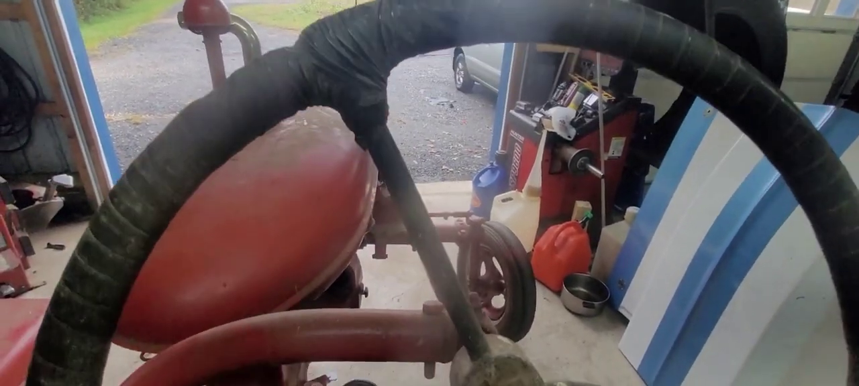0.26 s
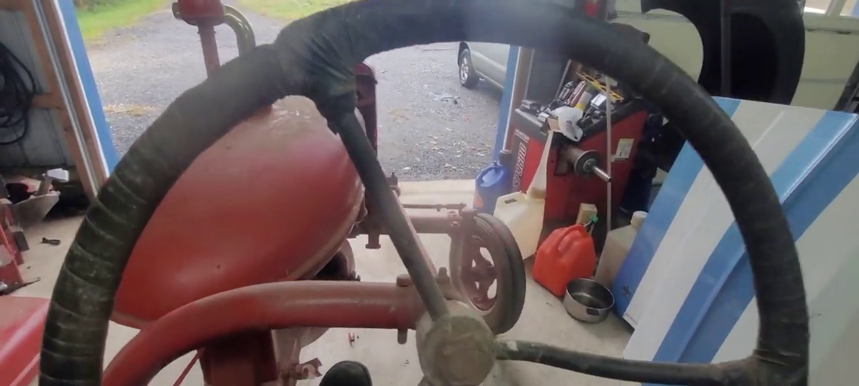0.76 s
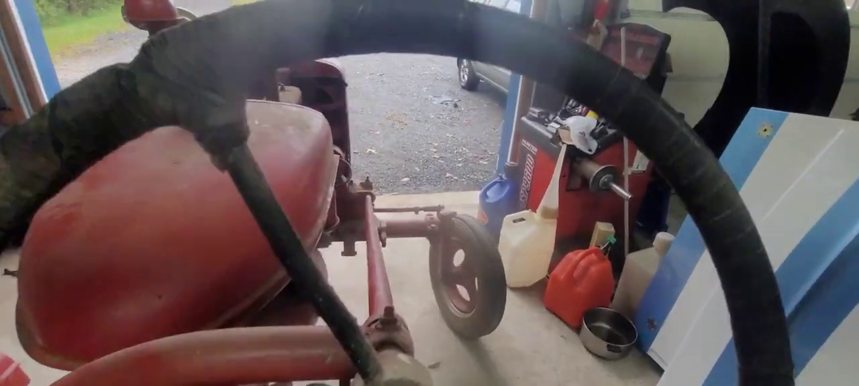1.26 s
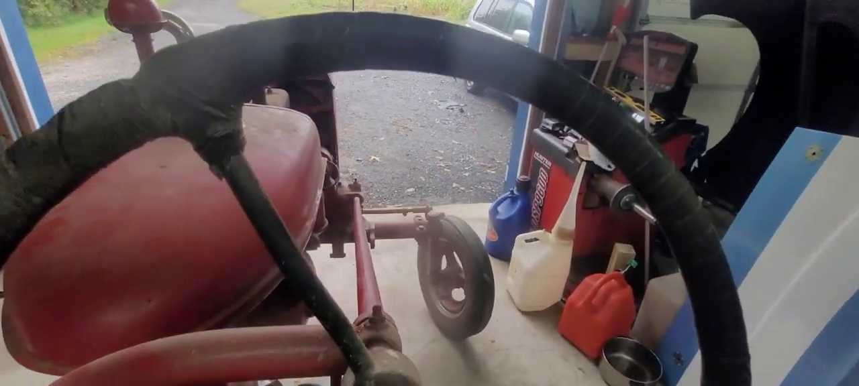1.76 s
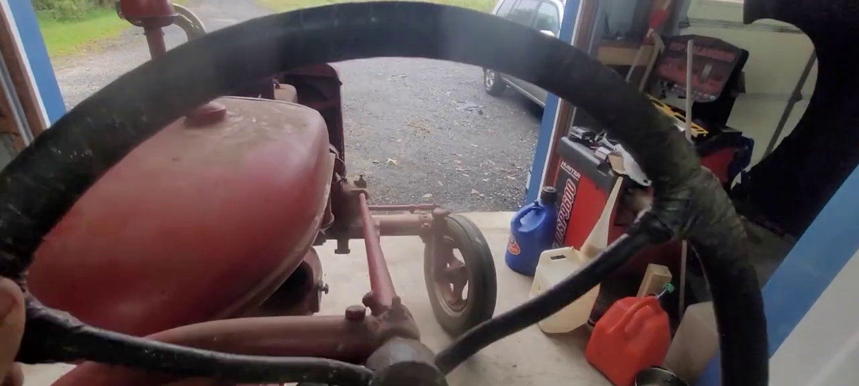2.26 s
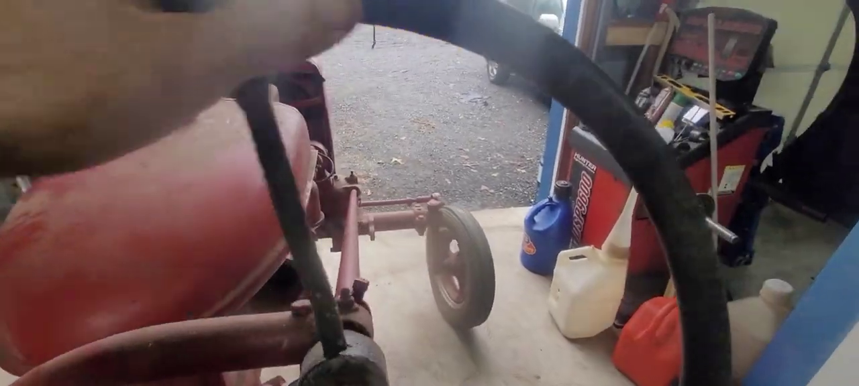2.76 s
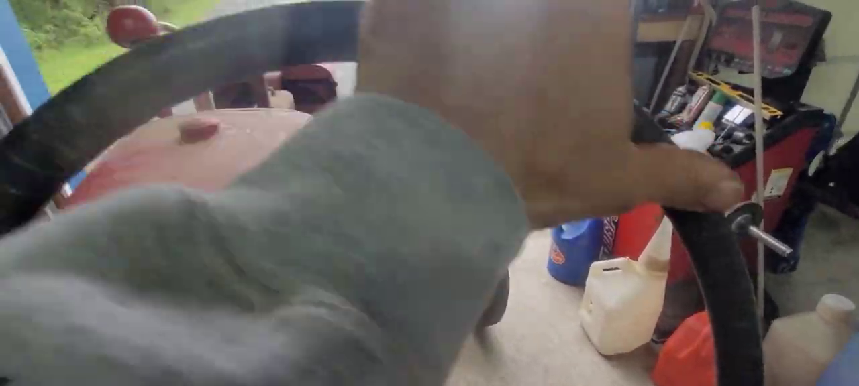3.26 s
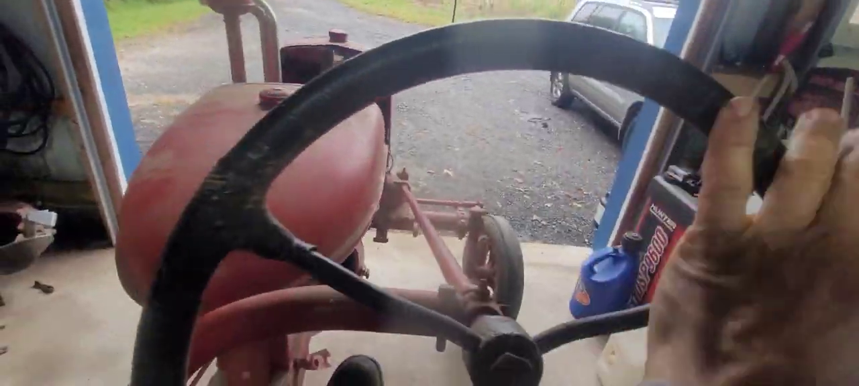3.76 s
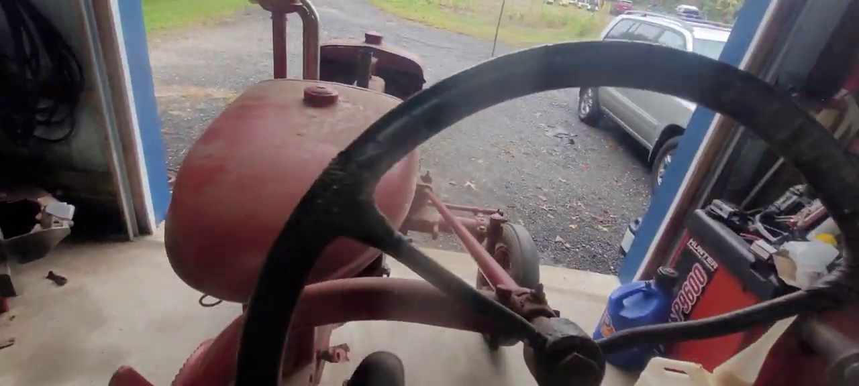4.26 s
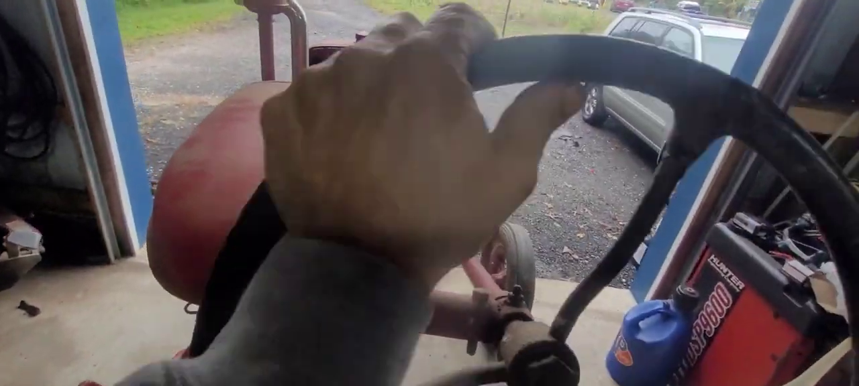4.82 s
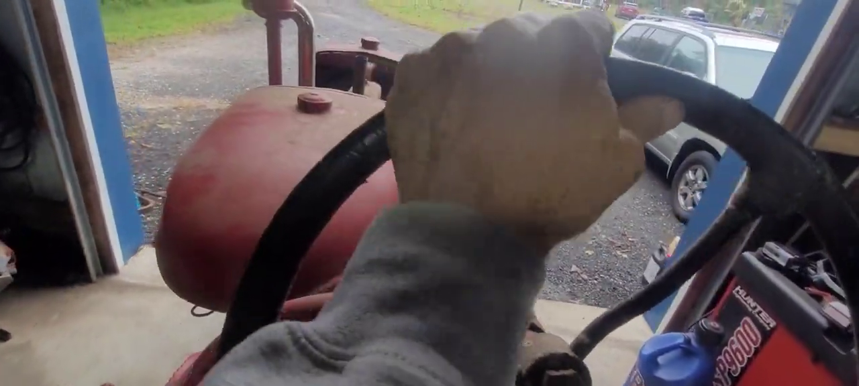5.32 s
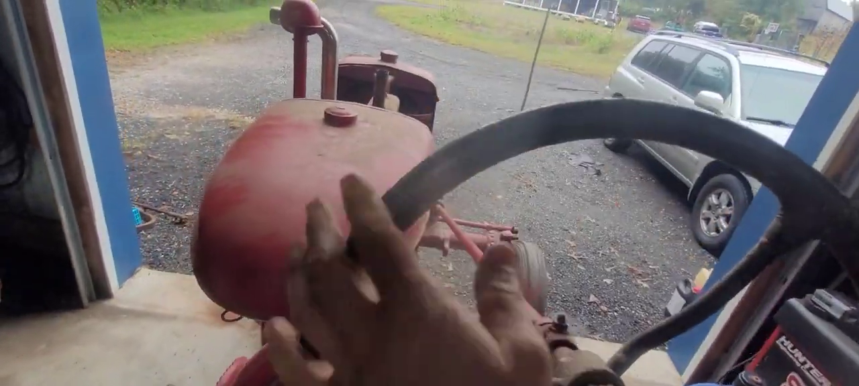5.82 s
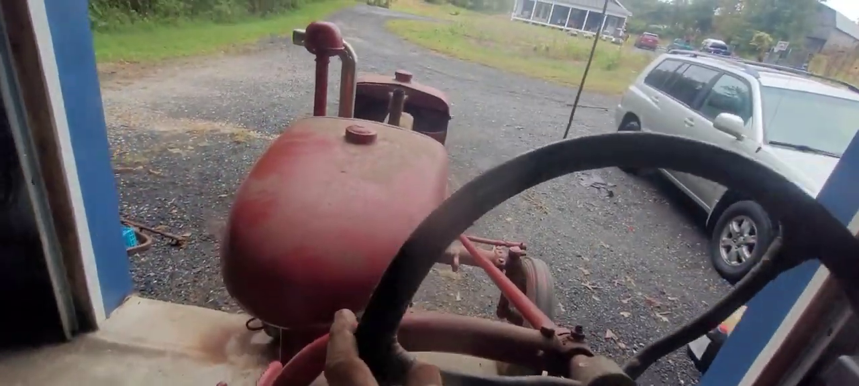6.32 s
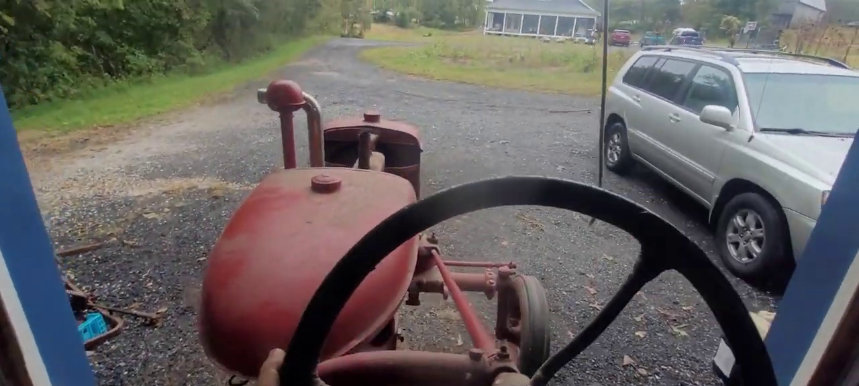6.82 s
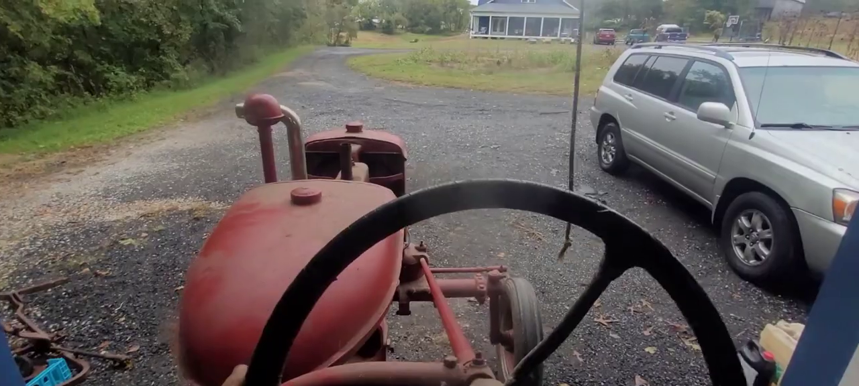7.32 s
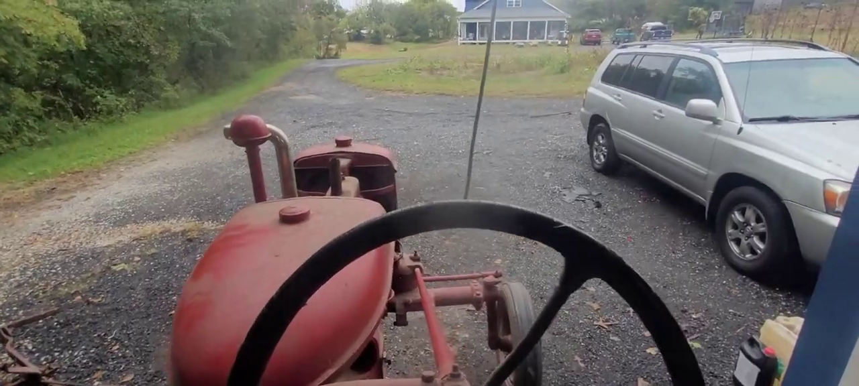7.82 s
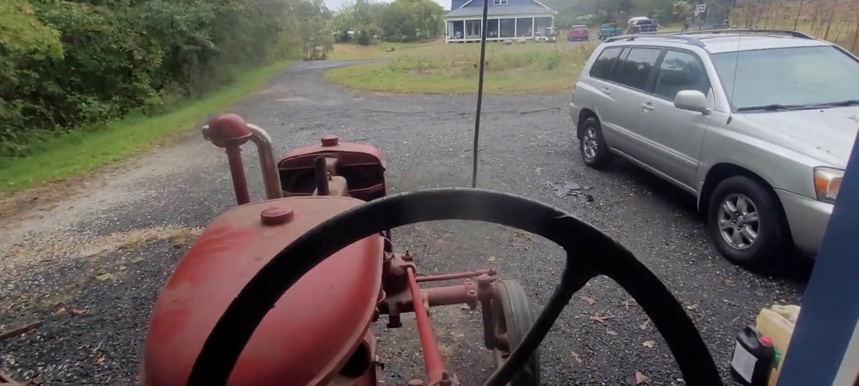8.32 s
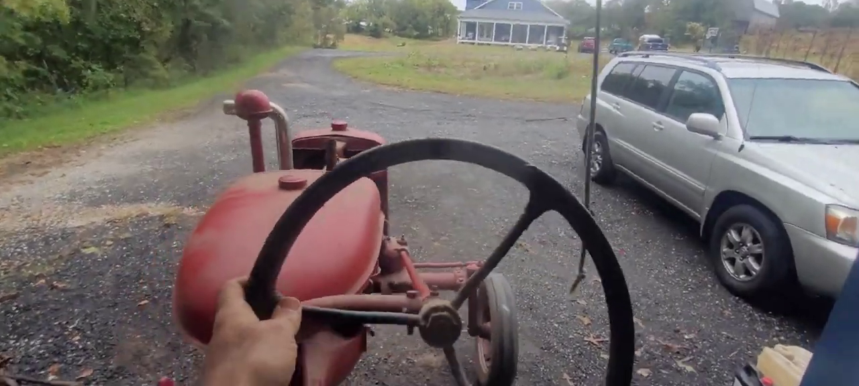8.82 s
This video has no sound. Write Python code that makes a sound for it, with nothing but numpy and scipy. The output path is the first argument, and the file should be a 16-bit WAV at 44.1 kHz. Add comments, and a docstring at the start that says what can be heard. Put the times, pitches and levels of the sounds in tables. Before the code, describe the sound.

An old four-cylinder tractor engine runs at low speed, heard close from the driver's seat as it leaves a garage. The exhaust throbs deeply over chuffing, ticking valves, a dull knock and fan hiss. Early on the engine sags as the clutch takes up, then recovers and chugs steadily, sometimes missing a beat. Loose metal clanks here and there. Near the end it lugs again and a linkage rattles rapidly.

```python
"""Old tractor leaving a garage

A four-cylinder engine at about 1200 rpm, heard from the seat. The exhaust booms on the sixth crank
order, sags as the clutch takes up and now and then misses a beat. Each firing chuffs, one cylinder
knocks, the valve gear ticks, the fan hisses and loose metal clatters when the engine lugs."""
import sys
import numpy as np
from scipy import signal
from scipy.fft import rfft, irfft
from scipy.io import wavfile

SR = 44100
rng = np.random.default_rng(int(sys.argv[2]) if len(sys.argv) > 2 else 0)


def unload_audio(sound):
    """Save the sound as a 16-bit wav file, at the path given as the first command line argument."""
    columns = np.transpose(np.atleast_2d(sound))
    # keep every value between -1 and 1, then stretch to whole-number steps
    steps = np.round(np.clip(columns, -1, 1) * 32767)
    wavfile.write(sys.argv[1], SR, steps.astype(np.int16))


N = 400428
TIME = np.arange(N) / SR
FREQ = np.fft.rfftfreq(N, 1 / SR)
BLOW_AGE_S = np.arange(4096) / SR

# crank speed: t/s, f/Hz
CRANK_SPEED = [(0, 20.217), (0.35, 20.065), (0.9, 18.047), (1.22, 18.971), (2.34, 20.34), (2.67, 19.986),
               (3.7, 20.025), (3.9, 19.545), (4.34, 19.845), (5.07, 19.451), (5.7, 19.65), (6.13, 20.252),
               (6.51, 19.98), (7.07, 20.401), (7.89, 19.625), (8.34, 19.976), (8.6, 19.486), (8.83, 16.554),
               (9.08, 19.211)]
# engine load above cruise: t/s, level/dB
ENGINE_LOAD = [(0, 3), (0.35, 2), (0.55, 2.5), (1.35, 3.5), (1.62, 5.5), (2.05, 1), (3.7, 0.1), (6.2, 0.65),
               (7.15, -0.5), (8.15, 3.5), (8.5, 4), (8.72, 6.5), (9.08, 6)]
# prominence of ticks and knocks as the garage falls behind: t/s, level/dB
DIRECT_SOUND = [(0, -11), (2, -12.5), (4.5, -4.5), (6, -3.5), (7, -1), (8.6, -2), (9.08, -7)]

# exhaust order 6 while in tune: t/s, level/dB
BOOM_LEVEL = [(0, -11), (1.35, -14.5), (1.7, -10), (4.7, -11), (5.1, -12), (5.3, -14.5), (6, -10.5),
              (7.2, -14.5), (7.55, -12.5), (7.9, -20), (8.35, -9.5), (8.6, -17), (9.08, -12.5)]
# exhaust order 7: t/s, level/dB
THROB_LEVEL = [(0, -30), (1.55, -16), (2, -22), (4.7, -20.5), (7.3, -27.5), (8.3, -23), (9.08, -18)]
# upper pipe resonance: t/s, level/dB
HUM_LEVEL = [(0, -39), (0.9, -32.5), (2.0, -32), (3.3, -31.5), (4.3, -37), (5.2, -37.5), (6.5, -33.5),
             (7, -43), (8.1, -29.5), (9.08, -45)]
# weak exhaust lines: crank order, level/dB
WEAK_ORDERS = [(5, -43), (10, -48.5), (12, -43), (15, -44.5), (16, -46.5), (17, -50.5), (18, -53.5),
               (22, -54), (25, -54.5), (30, -50.5)]
# exhaust lines added when lugging: crank order, level/dB
LUG_ORDERS = [(14, -39.5), (16, -45), (17, -44.5)]
# missed firings: t/s, thump level/dB, share of exhaust lost, time to deepest dip/s
MISFIRES = [(0.503, -32, 0.54, .02), (0.622, -45, 0.97, .012), (1.47, -32, 0.49, 0.032),
            (2.598, -37, 0.29, .022), (3.798, -34, .28, 0.053), (4.83, -27, 0.35, 0.076),
            (6.44, -25, .25, .025), (7.276, -35, .28, 0.02), (7.529, -28, .4, .03), (7.74, -33, 0.25, .04),
            (8.41, -25, 0.19, .03), (8.608, -35, 0.67, 0.021)]
# passing tones: t/s, length/s, crank order, level/dB
WHINE_TONES = [(0, 0.53, 30, -41), (1.8, 0.7, 18, -47), (1.85, 1.7, 30, -46), (3.35, 2.3, 31.5, -45.5),
               (3.7, 1.1, 29, -50), (4.8, 1.2, 25, -45), (3.5, 0.97, 16, -40), (5.85, .9, 18, -42.5),
               (5.85, 1, 29, -45), (7.1, 1.3, 30, -43)]

# firings per four-stroke cycle: phase/cycles, level/dB
FIRING_PATTERN = [(0.053, 0), (0.31, -2.5), (.525, -2.5), (0.79, -2.5)]
# valve ticks per cycle: phase/cycles, level/dB
VALVE_PATTERN = [(.07, 2.5), (.315, 0), (.42, -1.5), (.55, -12), (.812, -3), (.92, -2.5)]
# hardest cylinder knocks: t/s, level/dB, tilt/(dB/octave)
HARD_BLOWS = [(0.5095, -25, -4), (0.829, -30, 2), (1.57, -31.5, 1), (1.672, -32, -1), (2.774, -33, -6),
              (3.473, -33, -6), (3.675, -33, 2), (4.18, -34, 2), (4.275, -35, -4), (4.404, -34, -1),
              (5.2, -32, 3), (6.114, -29, -1.5), (6.406, -34, -1), (6.73, -37, -6), (6.807, -35, -4),
              (7.824, -31, 2), (8.1, -29, -3), (8.205, -31.5, 4), (8.306, -27, -1), (8.509, -27.5, -6),
              (8.721, -24.5, 0)]
# loose parts hitting: t/s, level/dB, body offset/dB, top offset/dB
LOOSE_HITS = [(0.5104, -27.5, -1, -11), (0.83, -27.5, -5, -3), (1.0186, -25, -17, -9),
              (1.1195, -30, -3, -10), (1.581, -24, -12, -4), (1.7, -26, -6, -4), (1.8745, -32, -1, -9),
              (1.912, -25, -12, -7), (2.348, -24, -21, -6), (2.364, -24, -20, -3), (3.557, -24, -20, -6),
              (3.901, -23, -20, -12), (3.914, -23.5, -15, -8), (4.168, -25.5, -12, -4),
              (4.617, -33, -15, -3), (5.0685, -32, -12, 2), (5.58, -34, -15, -1), (5.708, -25, -14, -8),
              (6.1075, -28, -6, -5), (6.5301, -21, -6, -5), (6.5679, -19, -11, 0), (6.925, -25, -15, -5),
              (7.073, -26, -18, -7), (7.3701, -22, -22, -5), (7.469, -30, -20, 1), (7.6206, -30, -14, -2),
              (7.671, -28, -10, 1), (7.8223, -23, -11, -1), (7.976, -19, -23, -7), (8.3784, -23, -17, 1),
              (8.507, -20, -1, -1), (8.786, -32, -8, -3)]
# linkage hitting its stop near stall: t/s, level/dB, emphasis f/Hz
LINKAGE_HITS = [(8.8159, -33, 6200), (8.8467, -33, 6500), (8.8753, -24.5, 1150), (8.9058, -23, 7500),
                (8.9325, -27, 6600), (8.9627, -19.5, 4000), (8.99, -23, 6050), (9.019, -23.5, 3900),
                (9.0439, -27, 6800), (9.074, -28, 3800)]
# metal rings and scrapes: t/s, length/s, f/Hz, width/Hz, level/dB
SCRAPES = [(0.473, 0.029, 260, 90, -26), (0.827, .035, 1700, 250, -39), (1.07, 0.15, 1700, 160, -37),
           (1.09, .06, 2470, 150, -36), (1.11, .035, 3110, 130, -37), (1.565, .055, 3870, 450, -30.5),
           (1.62, 0.12, 4000, 800, -34), (1.665, 0.066, 2480, 160, -32.5), (2.966, .045, 2120, 100, -40),
           (2.97, 0.078, 2480, 100, -41), (3.903, .06, 5500, 4000, -37), (3.949, 0.63, 1090, 160, -42.5),
           (4.26, .04, 465, 160, -31), (5.195, 0.045, 2200, 900, -38), (5.196, 0.037, 4300, 800, -37.5),
           (5.198, .035, 1680, 220, -36), (5.9, .32, 1643, 90, -42.5), (5.88, 0.38, 1185, 70, -41.5),
           (5.92, .36, 1030, 300, -42), (6.106, .008, 12500, 700, -33), (6.406, .014, 1400, 300, -29.5),
           (6.448, 0.025, 240, 80, -26.5), (6.568, 0.037, 12000, 1800, -33),
           (7.815, 0.034, 1880, 120, -30.5), (8.505, 0.055, 3940, 400, -34.5),
           (8.508, 0.043, 2180, 300, -35), (8.667, 0.082, 990, 700, -28)]

# block and bonnet modes: f/Hz, level/dB
CASTING_MODES = [(490, -3), (640, 2.5), (760, -10), (900, -5), (1030, 1.5), (1130, -5.5), (1430, -3),
                 (1680, -4), (2150, 0), (2460, -6)]
# iron and steel part modes: f/Hz, level/dB
IRON_MODES = [(970, 1.5), (1400, 0), (1696, 0), (2140, 0), (2470, -0.5), (3200, -6), (3800, -2.5),
              (4680, -3), (6108, 1.5), (7300, -1.5)]
# linkage modes: f/Hz, level/dB
LINKAGE_MODES = [(1200, 0), (1710, -3), (2430, -8), (3220, -5.5), (3790, -0.5), (4390, -2.5), (4680, -6),
                 (6100, -3), (6550, -9), (7380, -10), (12800, -7), (14800, 1), (15200, -3)]
# panel resonances: f/Hz, width/Hz, boost/dB
PANEL_PEAKS = [(307, 28, 5.5), (473, 27, 4), (621, 103, 4), (960, 46, 3), (1670, 47, 5), (2134, 26, 4),
               (2460, 130, 2)]

# noise spectra: f/Hz, relative level/dB
BLOCK_SPECTRUM = [(150, -13), (260, 1.5), (305, -5), (391, -5.5), (482, -5.5), (543, -6), (599, -3.5),
                  (776, -9), (947, -8), (1290, -10), (2160, -13.5), (2800, -21.5), (3640, -34),
                  (6160, -120)]
RUMBLE_SPECTRUM = [(20, -30), (40, -11), (60, -2), (100, -0.5), (150, 7), (200, 1), (280, -11),
                   (400, -13.5), (800, -42)]
PIPE_BARK_SPECTRUM = [(150, -7), (240, -2), (295, -2), (380, -6), (600, -45)]
FIRING_KNOCK_SPECTRUM = [(450, -34), (680, -1), (1000, 1), (1400, -5.5), (2500, -54)]
FAN_GEAR_SPECTRUM = [(1530, -8.5), (2600, -3), (2850, -2.5), (4230, 0.5), (4670, -1.5), (5690, 1),
                     (6190, -1), (6990, -4), (7650, -1.5), (8260, -9.5), (8780, -12.5), (12400, -0.5),
                     (15600, -0.5), (16500, -6)]
CLANK_SPECTRUM = [(1530, -21), (2600, -10), (2810, -16), (3770, -7), (4530, 2), (5040, 7.5), (6050, 5),
                  (7600, 5.5), (8640, -4), (14700, 0), (16000, -16)]
CLATTER_BODY_SPECTRUM = [(250, 3.5), (700, 2.5), (1200, 5), (2100, -7), (3200, -1.5), (6000, -46)]
CLATTER_TOP_SPECTRUM = [(7000, -27), (9500, 0), (12000, 6.5), (15500, 6)]

# left-right noise coherence: f/Hz, coherence (clipped to 0-1)
COHERENCE = [(100, 0), (280, 1.05), (600, 0.57), (1200, 0.66), (2200, -0.31), (5000, 0.22), (15000, 0)]
# noise balance: f/Hz, left minus right/dB
NOISE_BALANCE = [(60, 3), (250, -1.5), (600, 0.5), (1200, -4.5), (2200, -1.5), (4400, 0.5), (8000, 2.5),
                 (13000, 1)]
# exhaust balance as the walls pass: t/s, left minus right/dB
EXHAUST_BALANCE = [(0, -0.7), (3, -1.5), (5.7, -1.4), (9.08, -0.7)]


def exhaust(turns, valve_turns=0.037, advance_turns=0.022, in_tune_hz=19.15, stall_hz=17.9):
    """Crank orders from the pipe; the 6th and 7th beat into a throb on every turn."""
    angle = 2 * np.pi * (turns - valve_turns)
    crank_hz, load_db = follow(CRANK_SPEED), follow(ENGINE_LOAD)
    # from about 6.5 s orders 4 and 7 run slightly ahead of the 6th, shifting the throb's timing
    early_angle = angle + 2 * np.pi * advance_turns * np.interp(TIME, [6.1, 6.7], [0, 1])
    stall_db = 6 * np.maximum(stall_hz - crank_hz, 0)
    off_tune_db = 38 * np.maximum(in_tune_hz - crank_hz, 0)
    fourth = amp(-33 + 1.9 * throttle_db() - stall_db + 1.35 * wander(7.8)) * np.cos(4 * early_angle)
    sixth = amp(follow(BOOM_LEVEL) - off_tune_db + 0.73 * wander(8.7)) * np.cos(6 * angle)
    seventh = amp(follow(THROB_LEVEL) - stall_db + 1.4 * wander(11)) * np.cos(7 * early_angle)
    unevenness = 0.036 * amp(load_db) * wander(34)
    boom = (fourth + sixth + seventh) * (1 + unevenness)
    overtones = sum(amp(db) * (1 + 0.41 * wander(5.3)) * np.cos(order * angle + random_phase())
                    for order, db in WEAK_ORDERS)
    growl = lugging() * sum(amp(db) * np.cos(order * angle + random_phase()) for order, db in LUG_ORDERS)
    resonances = pipe_resonances(angle, crank_hz, load_db)
    return np.sqrt(2) * (boom + growl + resonances + overtones * amp(0.61 * load_db))


def pipe_resonances(angle, crank_hz, load_db, drone_hz=154, hum_hz=218.2):
    """A drone and a hum, each driven by the nearest crank orders."""
    orders = np.array([[8], [9]])
    weights = resonance(orders * crank_hz, drone_hz, width_hz=14)
    drone = (weights * np.sin(orders * angle)).sum(0) / np.linalg.norm(weights, axis=0)
    orders = np.array([[11], [12], [13]])
    weights = resonance(orders * crank_hz, hum_hz, width_hz=16)
    hum = -(weights * np.sin(orders * angle)).sum(0)
    drone_db = -35.5 + 1.5 * load_db + wander(5.5)
    return amp(drone_db) * drone + amp(follow(HUM_LEVEL)) * hum


def misfire(pipe, thump_hz=55, thump_s=0.012, trim_db=-1):
    """A missed firing briefly starves the pipe and leaves a low thump."""
    for start_s, db, lost, dip_s in MISFIRES:
        age_s = np.maximum(TIME - start_s, 0)
        swell = age_s / thump_s * np.exp(1 - age_s / thump_s)
        starved = age_s / dip_s * np.exp(1 - age_s / dip_s)
        thump = amp(db + trim_db) * swell * np.sin(2 * np.pi * thump_hz * age_s)
        pipe = pipe * (1 - lost * starved ** 2) + thump
    return pipe


def exhaust_stereo(pipe):
    """Long waves reach both sides almost alike, leaning slightly right."""
    lean_db = follow(EXHAUST_BALANCE) / 2
    return lag_right(pipe, lag_s=0.00012) * amp([lean_db, -lean_db])


def combustion(turns, floor_power=0.54):
    """Firings shake the block and puff from the pipe; valves ring the iron. All grow with load."""
    at, db = each_cycle(turns, FIRING_PATTERN, scatter_db=4)
    puffs = ring_down(at, db, decay_s=0.016, tail_s=0.072, tail_db=5)
    chuff = unit(np.sqrt(floor_power + puffs / puffs.mean()))
    load_db = follow(ENGINE_LOAD)
    rumble = amp(-39 + 2.07 * load_db) * noise(RUMBLE_SPECTRUM)
    bark = amp(-41 + 1.17 * load_db) * lugging() * noise(PIPE_BARK_SPECTRUM)
    knock_db = -42 + load_db + follow(DIRECT_SOUND)
    knock = amp(knock_db) * unit(np.sqrt(puffs)) * noise(FIRING_KNOCK_SPECTRUM)
    at, db = each_cycle(turns, VALVE_PATTERN, scatter_db=3)
    valve_ring = amp(-47 + load_db) * unit(strike(IRON_MODES, at, db, ring_s=0.018, rise_s=0.001))
    block = amp(-36 + load_db) * (block_thuds(turns) + chuff * noise(BLOCK_SPECTRUM))
    return block + chuff * (rumble + bark) + knock + valve_ring


def block_thuds(turns):
    """Each cylinder shakes the block with its own waveform, repeated every cycle."""
    envelope = blow_envelope(ring_s=0.026, rise_s=0.0025)
    responses = np.array_split(noise(BLOCK_SPECTRUM), len(FIRING_PATTERN), axis=1)
    out = np.zeros((2, N))
    for cylinder, response in zip(FIRING_PATTERN, responses):
        at, db = each_cycle(turns, [cylinder], scatter_db=1.5)
        impulses = np.bincount(at, amp(db), N)
        thud = unit(response[:, :len(envelope)] * envelope)
        out += signal.oaconvolve(impulses[None], thud, axes=1)[:, :N]
    return unit(out)


def cylinder_knock(turns, phase_cycles=0.075, level_db=-38, ring_s=0.018, lean_db=-1.5):
    """One worn cylinder knocks dully on each cycle, now and then hard."""
    at, db = each_cycle(turns, [(phase_cycles, level_db)], scatter_db=-0.5)
    db = db + 0.45 * follow(ENGINE_LOAD)[at] + 0.4 * follow(DIRECT_SOUND)[at]
    dull = strike(CASTING_MODES, at, db, ring_s, rise_s=0.0043, tilt_db_oct=-1.5)
    start_s, db, tilts = np.transpose(HARD_BLOWS)
    hard = strike(CASTING_MODES, samples(start_s), db, ring_s, rise_s=0.0027,
                  tilt_db_oct=tilts, detune=0.072)
    return (dull + hard) * amp([[lean_db], [-lean_db]])


def machinery(turns, fan_db=-39.5, tick_db=-44, grit_db=-47, clutch_db=-35, grit_per_s=60):
    """Fan and gear hiss, valve ticks, clumps of fine rattle and the slipping clutch."""
    at, db = each_cycle(turns, VALVE_PATTERN, scatter_db=4)
    ticks = ring_down(at, db, decay_s=0.003, tail_s=0.015, tail_db=-12)
    tick_power = amp(tick_db + 0.46 * follow(DIRECT_SOUND)) ** 2 * ticks / ticks.mean()
    at = random_hits(grit_per_s)
    db = 7 * rng.uniform(-1.9, 1, len(at)) + 4 * np.tanh(wander(11))[at]
    grit = ring_down(at, db, decay_s=0.00085, tail_s=0.015, tail_db=-6.5)
    grit /= grit.mean()
    running_power = amp(fan_db) ** 2 + tick_power + amp(grit_db) ** 2 * grit
    slip = np.interp(TIME, [0.66, 1.73], [0, 0.94], right=0)  # builds until the clutch closes
    clutch_power = amp(clutch_db) ** 2 * slip * (1 + grit) / 2
    envelope = np.sqrt(amp(throttle_db()) ** 2 * running_power + clutch_power)
    return envelope * amp(0.5 * wander(10.5)) * noise(FAN_GEAR_SPECTRUM)


def clatter(top_lean_db=2):
    """Loose parts and linkage hit: dull body, clank, bright top, short ring."""
    linkage_rows = [(start_s, -16, -6.5, -4) for start_s, *_ in LINKAGE_HITS]  # columns as LOOSE_HITS
    start_s, db, body_db, top_db = np.vstack([LOOSE_HITS, linkage_rows]).T
    at = samples(start_s)
    body_power = ring_down(at, db + body_db - 2, decay_s=0.0068, tail_s=0.043, tail_db=-13)
    clank_power = ring_down(at, db - 11, decay_s=0.0045, tail_s=0.025, tail_db=-18)
    top_power = ring_down(at, db + top_db - 2, decay_s=0.004, tail_s=0.025, tail_db=-18)
    body = np.sqrt(body_power) * noise(CLATTER_BODY_SPECTRUM)
    clank = np.sqrt(clank_power) * noise(CLANK_SPECTRUM)
    top = np.sqrt(top_power) * noise(CLATTER_TOP_SPECTRUM) * amp([[top_lean_db], [-top_lean_db]])
    ring = strike(IRON_MODES, at, db - 18, ring_s=0.025, rise_s=0.0003)
    return body + clank + top + ring


def linkage_judder(ring_s=0.0072, rise_s=0.0004, focus_db=6, focus_oct=0.27, bounce_s=0.0021):
    """The linkage clacks and bounces once; where it lands decides which modes ring most."""
    start_s, db, focus_hz = np.transpose(LINKAGE_HITS)
    offset_oct = np.log2(np.transpose(LINKAGE_MODES)[0] / focus_hz[:, None])
    mode_db = db[:, None] + focus_db * np.exp(-(offset_oct / focus_oct) ** 2)
    clack = strike(LINKAGE_MODES, samples(start_s), mode_db, ring_s, rise_s, detune=0.011)
    bounce = strike(LINKAGE_MODES, samples(start_s + bounce_s), mode_db - 3, ring_s, rise_s)
    return clack + bounce


def squeals(scratch_db=4, slip_hz=160):
    """Rubbed or shaken metal sings briefly in one resonance, in uneven slips."""
    out = np.zeros((2, N))
    slips = amp(scratch_db * np.tanh(wander(slip_hz))) * rng.standard_normal((2, N))
    for start_s, length_s, hz, width_hz, db in SCRAPES:
        span = slice(samples(start_s), samples(start_s + length_s))
        pole = np.exp((2j * np.pi * hz - np.pi * width_hz) / SR)
        ring = signal.lfilter([1], np.poly([pole, pole]), slips[:, span]).real
        out[:, span] += amp(db) * unit(ring) * signal.windows.tukey(ring.shape[1], 0.2)
    return out


def whines(turns, waver_db=1.5):
    """High crank orders swell and fade as narrow tones."""
    out = np.zeros(N)
    for start_s, length_s, order, db in WHINE_TONES:
        span = slice(samples(start_s), samples(start_s + length_s))
        tone = np.sin(2 * np.pi * order * turns[span] + random_phase())
        out[span] += amp(db) * unit(tone) * signal.windows.tukey(len(tone), 0.43)
    return lag_right(out * amp(waver_db * wander(4)), lag_s=0.00025)


def tinkles(per_s=45, level_db=-51, spread_db=4):
    """Nuts, rods and sheet edges tick at random, each favouring a few modes."""
    at = random_hits(per_s)
    emphasis_db = spread_db * np.minimum(rng.exponential(1, (len(at), len(IRON_MODES))), 3.1)
    mode_db = level_db + emphasis_db + 0.86 * follow(ENGINE_LOAD)[at, None]
    return strike(IRON_MODES, at, mode_db, ring_s=0.014, rise_s=0.0004, detune=0.0504)


def throttle_db(wide_open_db=4):
    """Load, capped at full throttle."""
    return np.minimum(follow(ENGINE_LOAD), wide_open_db)


def lugging():
    """Governor opening as speed drops below its median, 0-1."""
    crank_hz = follow(CRANK_SPEED)
    return np.clip(np.median(crank_hz) - crank_hz, 0, 1)


def each_cycle(turns, pattern, scatter_db):
    """Sample indices and levels of blows repeating every two crank turns."""
    hits = [np.flatnonzero(np.diff(np.floor(turns / 2 - phase)) > 0) for phase, _ in pattern]
    db = np.concatenate([np.full(len(at), level_db) for at, (_, level_db) in zip(hits, pattern)])
    return np.concatenate(hits), db + scatter_db * rng.uniform(-2.7, 1, len(db))


def strike(modes, at, db, ring_s, rise_s, tilt_db_oct=0, detune=0.0242):
    """Each blow lands on another spot and rings the modes in its own phases and tuning."""
    hz, mode_db = np.transpose(modes)
    envelope = blow_envelope(ring_s, rise_s)
    gains = amp(np.c_[db] + mode_db + np.outer(tilt_db_oct, np.log2(hz / np.median(hz))))
    draws = rng.uniform(-0.99, 1, (len(at), 3, len(hz)))  # left phase, right phase, tuning
    out = np.zeros((2, N + len(envelope)))
    for start, gain, draw in zip(at, gains, draws):
        tuned_hz = hz * (1 + detune * draw[2])
        angle = 2 * np.pi * np.outer(tuned_hz, BLOW_AGE_S) + np.pi * draw[:2, :, None]
        out[:, start:start + len(envelope)] += envelope * (gain @ np.sin(angle.astype("float32")))
    return out[:, :N]


def blow_envelope(ring_s, rise_s):
    """Exponential rise and decay."""
    return np.exp(-BLOW_AGE_S / ring_s) * (1 - np.exp(-BLOW_AGE_S / rise_s))


def ring_down(at, db, decay_s, tail_s, tail_db):
    """Power envelope of blows: quick decay plus slower tail."""
    blows = np.bincount(at, amp(db) ** 2, N)
    quick, tail = (signal.lfilter([1], [1, -np.exp(-1 / (s * SR))], blows) for s in (decay_s, tail_s))
    return quick + amp(tail_db) ** 2 * tail


def noise(spectrum, lag_s=0.0003):
    """Stereo noise coloured by a spectrum and the panels; left leads."""
    left, independent = rfft(rng.standard_normal((2, N)))
    coherence = np.clip(over_freq(COHERENCE), 0, 1)
    delayed = left * np.exp(-2j * np.pi * FREQ * lag_s)
    right = coherence * delayed + np.sqrt(1 - coherence ** 2) * independent
    panel_db = sum(db * resonance(FREQ, hz, width_hz) for hz, width_hz, db in PANEL_PEAKS)
    colour = amp(over_freq(spectrum) + panel_db)
    lean_db = over_freq(NOISE_BALANCE) / 2
    pair = irfft(np.array([left, right]) * amp([lean_db, -lean_db]) * colour, N)
    return pair / pair.mean(0).std()


def resonance(hz, centre_hz, width_hz):
    """Peak of height 1."""
    return 1 / (1 + (2 * (hz - centre_hz) / width_hz) ** 2)


def lag_right(x, lag_s):
    """Mono to stereo, right delayed."""
    return np.array([x, np.interp(TIME - lag_s, TIME, x)])


def follow(curve):
    """Time curve at every sample."""
    return np.interp(TIME, *np.transpose(curve))


def over_freq(curve):
    """Frequency curve at every FFT bin."""
    hz, value = np.transpose(curve)
    return np.interp(np.log(FREQ + 1), np.log(hz + 1), value)


def wander(rate_hz):
    """Low-passed random motion, rms 1."""
    return unit(irfft(rfft(rng.standard_normal(N)) / (1 + (FREQ / rate_hz) ** 4), N))


def random_hits(per_s):
    return np.flatnonzero(rng.random(N) < per_s / SR)


def random_phase():
    return rng.uniform(0, 2 * np.pi)


def samples(time_s):
    return np.round(time_s * SR).astype(int)


def amp(db):
    return 10 ** (np.asarray(db) / 20)


def unit(x):
    """Scale to rms 1."""
    return x / np.sqrt(np.mean(x ** 2) + 1e-20)


def scene():
    """One crankshaft times exhaust, firings and valve gear; loose metal rattles along."""
    turns = np.cumsum(follow(CRANK_SPEED)) / SR
    pipe = exhaust_stereo(misfire(exhaust(turns)))
    engine = pipe + combustion(turns) + cylinder_knock(turns) + whines(turns) + machinery(turns)
    return engine + tinkles() + clatter() + linkage_judder() + squeals()


def record(dry):
    """Low-pass at 15950 Hz."""
    lowpass = signal.firwin(511, 15950, window=("kaiser", 9), fs=SR)
    return signal.oaconvolve(dry, lowpass[None], "same")


dry = scene()
out = record(dry)
unload_audio(out)
```